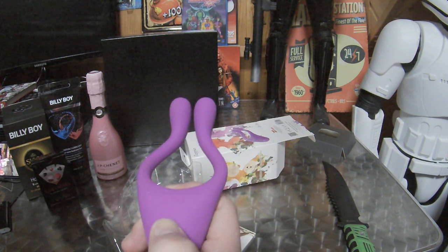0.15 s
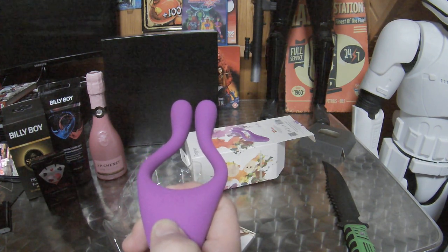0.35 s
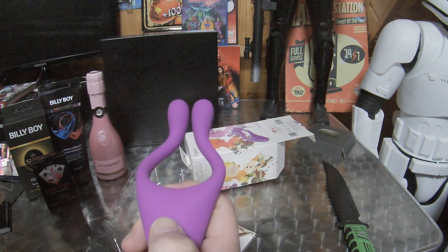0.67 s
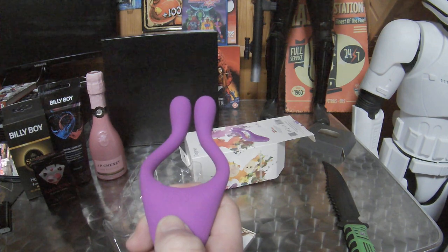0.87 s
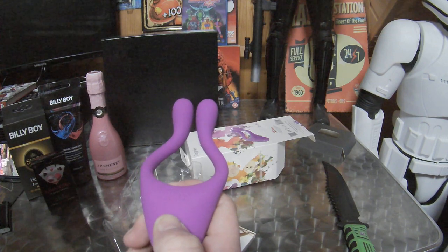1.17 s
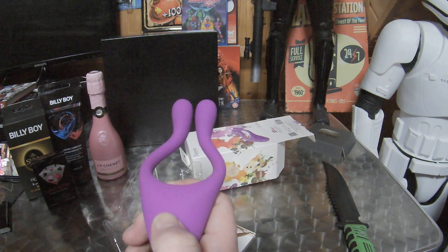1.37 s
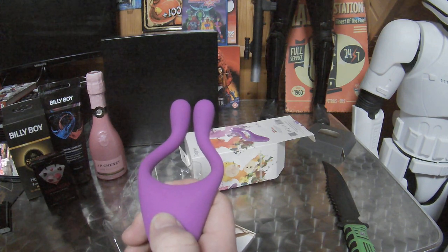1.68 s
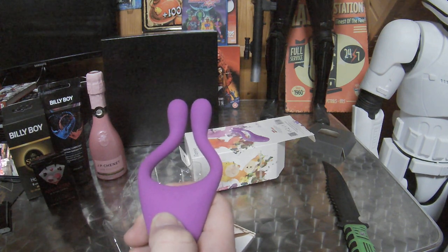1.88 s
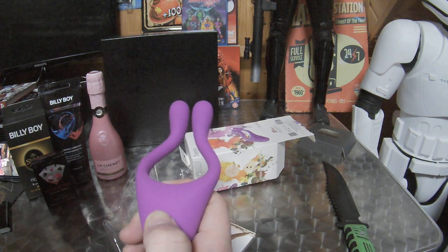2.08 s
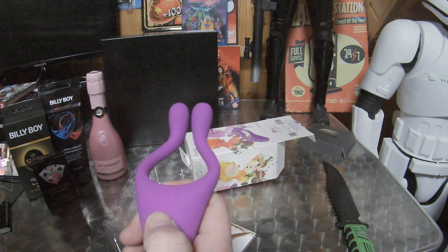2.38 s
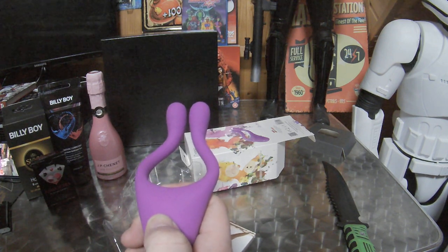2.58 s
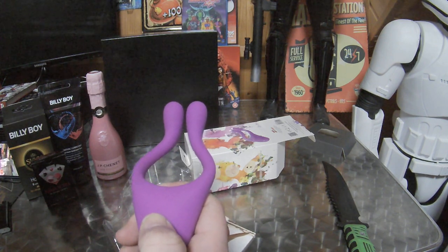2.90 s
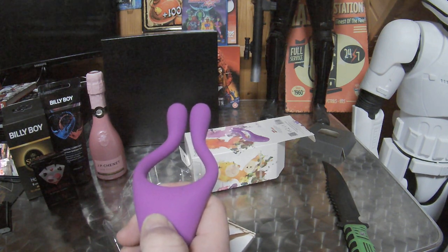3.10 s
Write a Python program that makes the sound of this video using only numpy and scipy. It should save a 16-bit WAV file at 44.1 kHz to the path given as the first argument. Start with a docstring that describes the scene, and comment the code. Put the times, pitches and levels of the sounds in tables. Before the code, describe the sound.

Button clicks on a small handheld vibrator, four sharp press-and-release pairs over a faint motor hum

```python
"""Button clicks over a humming handheld

A thumb presses and releases a dome button four times, each click a burst of short snaps and a ringing shell.
Two off-centre motor weights hum as sines whose speeds step around each release; the faster has a pulsing whirr.
Table echoes and a room tail throw the snaps back; shaped noise gives the microphone's hiss and rumble."""
import sys
import numpy as np
from scipy import signal
from scipy.fft import rfft, irfft
from scipy.io import wavfile
from scipy.ndimage import uniform_filter1d

SR = 44100
rng = np.random.default_rng(int(sys.argv[2]) if len(sys.argv) > 2 else 0)


def gain_from_db(level_db):
    """Turn a decibel level (scalar or array-like) into a linear amplitude factor."""
    decades = np.asarray(level_db, float) / 20
    return 10 ** decades


def digitize_waveform(pressure):
    """Quantize a signal to 16-bit integers and store it at the path in sys.argv[1].

    Rows of a 2-D input are taken as channels; values are limited to [-1, 1].
    """
    field = np.atleast_2d(pressure).T
    bounded = np.clip(field, -1, 1)
    quanta = np.round(bounded * 32767).astype(np.int16)
    wavfile.write(sys.argv[1], SR, quanta)


N = 143325  # samples, 3.25 s

NOISE_TOP_HZ = 13960  # the whirr and the hiss both stop here


def evened(x):
    """Scales a signal to rms 1."""
    return x / np.sqrt(np.mean(x ** 2) + 1e-20)


def read(points, hz):
    """Reads a spectrum table along a log frequency axis."""
    f, value = np.transpose(points)
    return np.interp(np.log(hz + 1), np.log(f + 1), value)


def add(mix, s, sound):
    """Mixes a sound in at a time in seconds, cut off at the end of the mix."""
    part = mix[round(s * SR):][:len(sound)]
    part += sound[:len(part)]


def slow_drift(rate):
    """Irregular drift of rms 1: sines of random phase from a tenth of the rate up to the rate in Hz."""
    t = np.arange(N) / SR
    drift = np.zeros(N)
    for f in np.geomspace(rate / 10, rate, num=16):
        drift += np.sin(2 * np.pi * (f * t + rng.random())) / np.sqrt(f)
    return evened(drift)


def patchy_noise(patch_db):
    """White noise whose level drifts by patch_db rms in patches of time and frequency."""
    shape = (N // 128 + 8, 257)  # frames, frequency bins
    patches = uniform_filter1d(rng.standard_normal(shape), size=14, axis=0)
    patches = evened(uniform_filter1d(patches, size=8, axis=1))
    white = rng.standard_normal(shape) + 1j * rng.standard_normal(shape)
    spectrum = white * gain_from_db(patch_db * patches)
    return signal.istft(spectrum.T, nperseg=512, noverlap=384)[1][:N]


def coloured(x, gain):
    """Filters the whole length by gain(hz), then scales to rms 1."""
    return evened(irfft(rfft(x) * gain(np.fft.rfftfreq(N, 1 / SR)), N))


def click(level_db, bright_db, pitch, chance):
    """The dome snaps over in short bursts and the shell rings on; returns the whole click and its snap."""
    # dome bursts before the grip's pitch factor: f/Hz, relative level/dB, delay/ms, Gaussian width/ms
    bursts = [(1740, -47, 1.4, 0.1), (3040, -24.5, 0.845, 0.14), (3940, -12, 0.95, 0.36),
              (5200, -12.5, 0.98, 0.22), (6540, -13, 0.74, .2), (8850, -2, 1.15, 0.24),
              (10890, -20.5, 0.89, .2), (12200, -20, 0.49, 0.3), (13950, -29, 0.98, 0.45)]
    # ringing modes of button and shell before the pitch factor: f/Hz, relative level/dB, t60/s
    modes = [(3837, -20, 0.037), (3917, -28.5, .06), (4100, -20.5, 0.044), (5310, -34, 0.047),
             (5930, -43, 0.035), (7680, -34.5, 0.11), (8300, -23, 0.021), (8740, -30, 0.031),
             (8500, -28, 0.031), (10250, -39, 0.026)]
    bright_from_hz, scatter_db, ring_rise_s = 7000, -0.5, 0.00086
    t = np.arange(round(.12 * SR)) / SR

    snap = np.zeros(len(t))
    for hz, db, delay_ms, width_ms in bursts:
        gain = gain_from_db(db + bright_db * (hz > bright_from_hz))
        envelope = np.exp(-.5 * ((t * 1000 - delay_ms) / width_ms) ** 2)
        snap += gain * envelope * np.sin(2 * np.pi * hz * pitch * t)

    ring = np.zeros(len(t))
    for (hz, db, t60), c in zip(modes, chance):
        # one chance value scatters both the level and the phase of a mode
        mode_db = db + bright_db * (hz > bright_from_hz) + scatter_db * c
        ring += gain_from_db(mode_db - 60 * t / t60) * np.sin(2 * np.pi * hz * pitch * t + c)
    ring *= 1 - np.exp(-(t / ring_rise_s) ** 2)
    return gain_from_db(level_db) * (snap + ring), gain_from_db(level_db) * snap


def room(x):
    """A few hard echoes off the table, and sparse taps whose bands die at their own speeds."""
    # echoes off the table and things on it: mean delay/ms, level/dB
    echoes = [(2.3, -11.5), (4.4, -17.5), (7.2, -22), (13.5, -33)]
    # decay of the room tail: f/Hz, t60/s
    decay = [(2000, 0.2), (4000, 0.25), (6000, 0.2), (9000, .12), (13000, 0.17)]
    tail_db, delay_spread, top_hz = -14.5, .03, 13500
    taps = np.zeros(SR // 2)
    at = np.arange(100, len(taps) - 20, 10)
    taps[at + rng.integers(0, 10, len(at))] = rng.choice([-1., 1.], len(at))

    hz, t, bands = signal.stft(taps, SR, nperseg=128)
    fade = gain_from_db(-60 * t / read(decay, hz)[:, None])
    tail = signal.istft(bands * fade, SR, nperseg=128)[1]
    response = gain_from_db(tail_db) * tail / np.linalg.norm(tail)
    for ms, db in echoes:
        delay_s = ms / 1000 * (1 + delay_spread * rng.standard_normal())
        add(response, delay_s, gain_from_db(np.array([db])))
    lowpass = signal.butter(8, top_hz, fs=SR, output="sos")
    return signal.sosfilt(lowpass, signal.fftconvolve(x, response))


def button():
    """Press and release clicks in turn; the table and room throw back the snap of each."""
    # clicks, press then release: t/s, level/dB, lift of the upper modes/dB, pitch factor set by the grip
    presses = [(.1036, -20, 5, 1), (0.2492, -14.5, -6, 0.99), (.967, -17.5, 6.5, 0.995),
               (1.1089, -14, -5.5, .985), (1.9987, -18.5, 5.5, 1.001), (2.154, -14.5, -6.5, 1.005),
               (2.8392, -19, 5.5, 1), (2.9911, -15, -5, 0.99)]
    lead_s = .0003  # the dome starts to bend just before it is heard
    clicks = np.zeros(N)
    for s, level_db, bright_db, pitch in presses:
        chance = rng.standard_normal(10)  # one per shell mode
        whole, snap = click(level_db, bright_db, pitch, chance)
        add(clicks, s - lead_s, whole)
        add(clicks, s - lead_s, room(snap))
    return clicks


def motor(curve):
    """An off-centre weight shakes once per turn, with a faint octave; also returns the turning angle."""
    octave_db, waver_hz, waver_db = -23, .5, 1.1  # the wavers are rms
    s, speed, db = np.transpose(curve)
    t = np.arange(N) / SR
    turns_per_s = np.interp(t, s, speed) + waver_hz * slow_drift(rate=8.3)
    angle = 2 * np.pi * (np.cumsum(turns_per_s) / SR + rng.random())
    shake = np.sqrt(2) * (np.sin(angle) + gain_from_db(octave_db) * np.sin(2 * angle))
    level_db = np.interp(t, s, db) + waver_db * slow_drift(rate=15)
    return gain_from_db(level_db) * shake, angle


def whirr(angle):
    """Whirr of the brushes through the microphone port: high hiss pulsing twice per turn."""
    # resonant humps: f/Hz, full width at -6 dB/Hz, relative level/dB
    humps = [(7820, 390, -3.5), (8370, 570, -2.5), (8770, 600, -5.5), (9570, 610, -4)]
    level_db, pulse_depth, patch_db = -64.5, 0.26, 0.2
    noise = patchy_noise(patch_db) * (1 + pulse_depth * np.cos(2 * angle))

    def gain(hz):
        power = sum(gain_from_db(2 * db) / (1 + (2 * (hz - f) / width) ** 2) ** 2 for f, width, db in humps)
        return np.sqrt(power) * (hz < NOISE_TOP_HZ)

    return gain_from_db(level_db) * coloured(noise, gain)


def scene():
    """Button clicks, two motors and the whirr of the faster one."""
    # centre curve of the faster motor: t/s, speed/turns per s, level/dB
    fast_curve = [(0, 168, -59), (.24, 168, -59), (.31, 161, -61.5), (1.08, 159.8, -61.5),
                  (1.16, 166.2, -60.5), (1.9, 166.3, -60), (2.08, 165.8, -58), (2.25, 167.7, -60),
                  (3.13, 167.6, -59.5), (3.25, 163, -62)]
    # centre curve of the slower motor: t/s, speed/turns per s, level/dB
    slow_curve = [(0, 130, -61), (.22, 129.5, -61), (.3, 121.8, -61), (1.08, 121.6, -61.5),
                  (1.16, 127.3, -62), (1.9, 127.5, -61.5), (2.1, 125.5, -64), (2.2, 128.5, -62),
                  (3.1, 128, -62), (3.25, 122, -63)]
    fast_hum, fast_angle = motor(fast_curve)
    slow_hum, _ = motor(slow_curve)
    return (button() + fast_hum + slow_hum + whirr(fast_angle))[None]


def microphone_noise():
    """The microphone's own hiss and rumble: patchy noise shaped by a spectrum."""
    # noise spectrum before levelling: f/Hz, relative density/dB
    spectrum = [(1, -13), (5, 1.5), (20, 0), (40, -3), (100, -13), (200, -19), (400, -24.5), (1000, -31),
                (2200, -32.5), (2900, -32), (4000, -35.5), (6500, -36), (7600, -31.5), (9000, -27),
                (10800, -36.5), (12300, -36), (13000, -32), (14000, -42)]
    level_db, patch_db = -54.5, 0.65

    def gain(hz):
        return gain_from_db(read(spectrum, hz)) * (hz < NOISE_TOP_HZ)

    return gain_from_db(level_db) * coloured(patchy_noise(patch_db), gain)


def roll_off(x):
    """The treble ends steeply here."""
    return signal.sosfilt(signal.butter(12, 15290, fs=SR, output="sos"), x)


def record(dry):
    """The microphone adds its noise and a constant offset."""
    offset = .008
    mix = dry + microphone_noise() + offset
    return roll_off(mix)


dry = scene()
out = record(dry)
digitize_waveform(out)
```